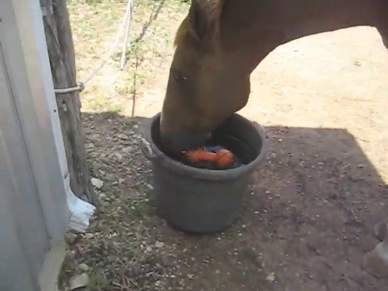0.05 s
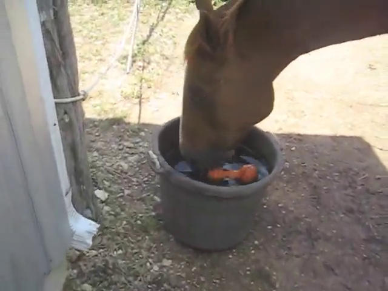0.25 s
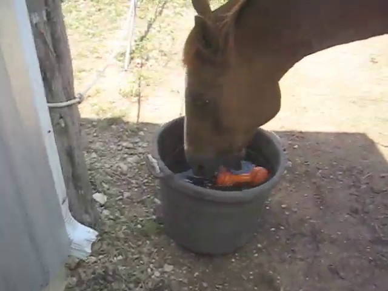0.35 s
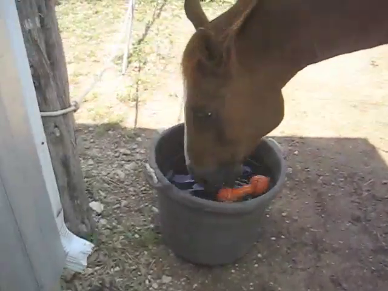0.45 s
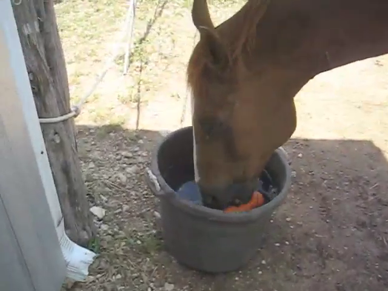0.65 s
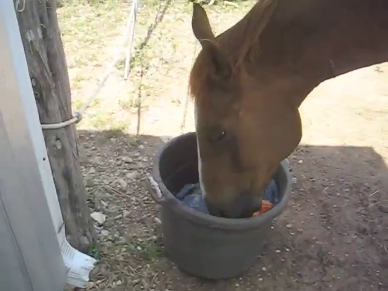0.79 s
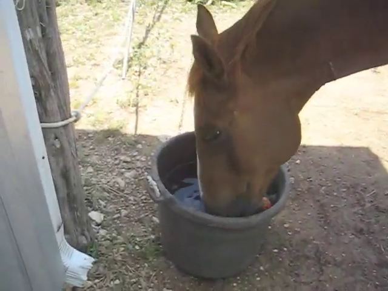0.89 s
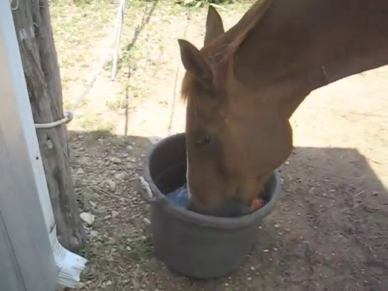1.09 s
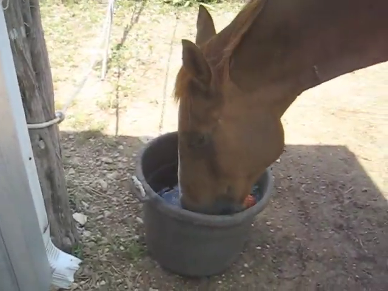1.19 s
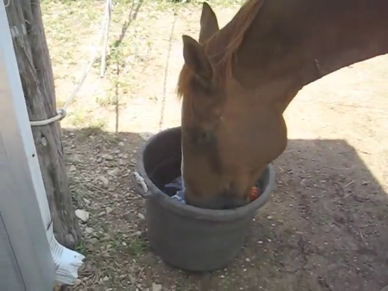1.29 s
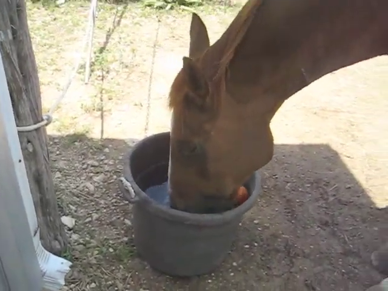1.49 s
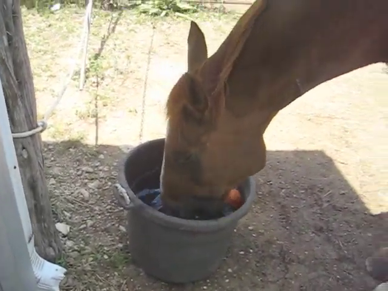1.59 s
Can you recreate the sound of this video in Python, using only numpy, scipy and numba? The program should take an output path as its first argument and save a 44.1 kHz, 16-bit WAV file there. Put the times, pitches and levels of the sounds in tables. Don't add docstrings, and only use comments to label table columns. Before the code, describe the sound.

Water splashes in a plastic tub as a horse pushes a floating toy: bubbles, sharp slaps, then a burst of churning with hollow knocks, fading to drips; small camera microphone a few metres away in a quiet yard.

```python
import sys
import numpy as np
from scipy import signal
from scipy.fft import rfft, irfft
from scipy.io import wavfile
from numba import njit

SR = 44100
rng = np.random.default_rng(int(sys.argv[2]) if len(sys.argv) > 2 else 0)


def wav_record(signal):
    frames = np.transpose(np.atleast_2d(signal))
    bounded = np.clip(frames, -1, 1)
    quanta = np.round(bounded * 32767).astype(np.int16)
    wavfile.write(sys.argv[1], SR, quanta)


def amplitude_ratio(level_db):
    exponent = np.asarray(level_db, float) / 20
    return 10 ** exponent


N = 72765

# (time [s], level [dB], pitch [Hz], ring T60 [s])
BUBBLE_EVENTS = [(.057, -36, 2910, 0.034), (0.212, -29.5, 990, 0.015), (.2745, -24, 3320, 0.01),
                 (0.274, -21.5, 5900, 0.0062), (.391, -23.5, 1380, 0.0084), (.507, -33, 3440, 0.01),
                 (0.59, -41, 1360, 0.036), (.647, -34.5, 1340, 0.011), (0.674, -28.5, 3036, 0.021),
                 (0.676, -33.5, 4380, 0.017), (0.686, -37, 2100, .012), (0.706, -37.5, 1920, 0.024),
                 (0.751, -26.5, 6010, 0.032), (.750, -23.5, 4150, 0.014), (0.751, -25, 4380, .022),
                 (.750, -33, 6800, 0.013), (.777, -41, 3900, 0.017), (0.7603, -31, 1170, 0.02),
                 (.761, -38, 910, .02), (.855, -34, 4740, .01), (0.8146, -22.5, 1860, 0.028),
                 (0.878, -25, 3320, 0.02), (0.984, -39.5, 1730, 0.025), (1.131, -37, 2740, 0.022),
                 (1.220, -39.5, 1886, 0.064), (1.2571, -35, 4070, 0.029), (1.275, -33.5, 2030, 0.0323),
                 (1.283, -34, 1330, 0.011), (1.3023, -31, 3520, 0.021), (1.378, -30, 1090, 0.02),
                 (1.524, -36.5, 3070, 0.018), (1.526, -40, 4570, 0.015), (1.622, -38, 3140, .025)]
# (time [s], level [dB], pitch
# [Hz])
GULP_EVENTS = [(0.217, -28, 1070), (0.219, -21.5, 3330), (0.2234, -30, 950), (0.23, -31, 1090),
               (0.272, -29, 1200), (.2115, -27, 900), (.454, -27, 3500), (.4545, -29, 2700),
               (1.146, -27, 4700), (.838, -29, 6700), (.222, -33, 5800), (.2255, -31, 1500),
               (.233, -34, 800), (.282, -33, 900), (.479, -36, 880), (.511, -34, 1150), (.836, -32, 1000),
               (.866, -25, 1050), (.884, -23, 1050), (.897, -25, 1150), (.900, -28, 800), (.912, -26, 1000),
               (1.312, -38, 850), (1.2585, -35, 4400), (.064, -38, 3150), (.05, -42, 2500),
               (1.363, -32, 6300), (1.626, -40, 3800), (1.05, -40, 2100), (0.225, -32, 1220),
               (0.288, -35, 1030), (0.343, -39.5, 1070), (0.496, -29, 1110), (0.8594, -26.5, 1160),
               (0.862, -21.5, 1380), (0.867, -20.5, 1250), (.877, -28, 990), (0.8807, -16, 1183),
               (0.889, -21.5, 990), (.893, -24, 1310), (.904, -23.5, 1340), (.9085, -19.5, 1200),
               (.943, -33, 1180), (0.967, -39, 900), (0.095, -36, 1140), (1.128, -33, 907),
               (1.14, -33.5, 1000), (1.228, -34, 1340), (1.294, -36, 1170), (1.384, -31, 2840),
               (1.388, -28, 6500), (1.272, -35, 4040)]
# (start [s], rise [s], fall [s], level [dB], spray relative to churn [dB])
SURGE_EVENTS = [(.185, 0.047, 0.06, -35, 2), (.27, 0.0096, 0.046, -31, -10), (.30, 0.042, 0.063, -34.5, -4),
                (.452, .008, 0.04, -41, 7), (.494, 0.011, 0.071, -36.5, 0.5),
                (0.754, .01, 0.071, -36, -6.5), (.82, 0.045, 0.039, -28.5, 3.5),
                (.865, .02, 0.04, -29.5, 4), (.885, 0.026, 0.042, -30.5, -1), (.93, .04, 0.075, -47, -19),
                (.55, 0.042, 0.064, -45, -6), (1.06, 0.055, 0.035, -44.5, 4), (1.12, 0.023, 0.039, -35, -3),
                (1.21, 0.013, 0.021, -44.5, 0), (1.345, 0.04, .035, -38.5, -0.5)]
# (time [s], level [dB], centre [Hz], scatter [s])
SLAP_EVENTS = [(0.2667, -10, 9360, .003), (.271, -17, 7000, 0.0043), (.391, -24.5, 4040, 0.0025),
               (0.4532, -9.5, 3500, 0.0096), (0.4536, -11, 5900, 0.0036), (0.497, -24, 6100, 0.004),
               (0.647, -26.5, 5900, 0.0078), (0.689, -20.5, 6900, 0.0075), (.8145, -22, 4800, 0.003),
               (.8365, -13.5, 7100, 0.0075), (.771, -23, 6040, .003), (.218, -22, 5750, 0.0093),
               (.864, -21, 4400, 0.009), (.8765, -18.5, 6000, 0.00296), (.883, -20, 5540, .008),
               (.899, -17.5, 6060, 0.0089), (1.378, -21.5, 1760, 0.011), (1.145, -11, 10000, 0.0025),
               (1.145, -12, 4600, 0.004), (1.146, -21.5, 1540, 0.0065), (0.2658, -19, 1570, 0.0026),
               (0.2729, -16.5, 5200, 0.0041), (.4535, -18, 1750, 0.009), (0.268, -34, 8000, 0.0037),
               (1.3023, -20.5, 3840, 0.0036), (1.361, -20, 5050, 0.0054), (1.429, -25, 12600, 0.0022),
               (1.472, -30, 3000, .004), (1.483, -24, 5200, 0.0062), (1.495, -27, 4800, 0.0041),
               (1.533, -29, 6640, 0.0031), (1.548, -29, 6500, 0.0049), (1.633, -24.5, 8600, 0.0039)]
# (time [s], level [dB], loudest mode [Hz], T60 [s])
BUMP_EVENTS = [(.209, -40, 440, 0.033), (.221, -39, 410, 0.027), (0.238, -42, 380, .03),
               (0.2759, -32, 295, .022), (.33, -47, 300, .03), (.344, -44, 480, .025),
               (0.4983, -26, 383, .018), (.506, -35, 557, .03), (.513, -41, 420, .02),
               (.762, -39.5, 487, 0.026), (.826, -34, 490, 0.03), (0.827, -38, 235, 0.054),
               (.847, -29, 176, 0.017), (0.854, -24, 320, 0.023), (.858, -24, 482, .035),
               (.857, -27, 767, 0.057), (0.864, -34, 194, 0.031), (.875, -26.5, 329, .03),
               (.882, -29, 494, 0.029), (.892, -25, 307, .035), (.908, -35, 480, 0.021),
               (0.912, -39, 325, 0.024), (1.382, -41, 588, 0.013)]
# (frequency [Hz], level [dB], T60 [s])
WALL_MODES = [(167, -11, 0.032), (240, 0, 0.033), (330, 4.5, 0.042), (370, -21, 0.23), (470, 11, 0.056),
              (775, 1.5, 0.045)]
# (time [s], level [dB])
WIND_GUSTS = [
    (1.22, -88),
    (1.3, -71),
    (1.4, -93),
    (1.46, -58),
    (1.502, -71),
    (1.585, -56),
    (1.65, -70),
]
# (time [s], level [dB], pitch [Hz], T60 [s])
WIND_PUFF = (1.627, -27, 95, .042)
# (frequency [Hz], density [dB per Hz])
YARD_SPECTRUM = [(71, -60), (120, -1.5), (684, 0), (1120, -0.5), (3450, -4.5), (11100, -16), (14700, -9),
                 (16000, -16)]
# (frequency [Hz], level [dB])
WHINE_TONES = [(15122, -83), (15149, -72)]

CHURN_HZ, CHURN_OCTAVES, CHURN_CYCLES = 1164, 0.45, 14.3
SPRAY_HZ, SPRAY_OCTAVES, SPRAY_CYCLES = 5200, 1.067, 7.8
CLUMP_S = 0.0021
GULP_CYCLES, SLAP_CYCLES = 13.1, 7.2
GRAIN_SIZE_DB = 5.5
ECHO_DB, ECHO_T60_S = -4, 0.013
TAIL_DB, TAIL_T60_S = -13, 0.1


@njit
def ring(n, at, hz, t60, size, glide, rise, hold, sr):
    y = np.zeros(n)
    for k in range(len(at)):
        start = int(at[k] * sr)
        length = int(t60[k] * sr) + 2
        step = 2 * np.pi * hz[k] / sr
        phase = 0.
        for j in range(max(start, 0), min(start + length, n)):
            u = (j - start) / length
            fade = np.exp(-6.9 * u * (1 - hold + hold * u))
            y[j] += size[k] * np.sin(phase) * min(phase / rise, 1.) * fade
            phase += step * (1 + glide * u)
    return y


def grains(at, hz, t60, size, glide, rise_cycles=0.93, hold=0.):
    rise = 2 * np.pi * max(rise_cycles, .05)
    hold = float(np.clip(hold, 0, 1))
    hz = np.clip(hz, 60., .4 * SR)
    return ring(N, 1. * at, hz, 1. * t60, 1. * size, float(glide), rise, hold, float(SR))


def swarm(at, db, hz, octaves, cycles, rise_cycles=0.51):
    f = hz * 2 ** (octaves * np.clip(rng.standard_normal(len(at)), -2, 2))
    spread = np.minimum(rng.exponential(size=len(at)), 2.5) - 2
    size = amplitude_ratio(db + GRAIN_SIZE_DB * spread) * rng.choice([-1, 1], len(at))
    return grains(at, f, cycles / f, size, 0.25, rise_cycles)


def band(x, lo_hz, hi_hz):
    sos = signal.butter(2, [lo_hz, min(hi_hz, .48 * SR)], "band", fs=SR, output="sos")
    return signal.sosfilt(sos, x)


def bubbles(count=4):
    t, db, hz, t60 = np.array(BUBBLE_EVENTS).T
    out = grains(t, hz, 0.5 * t60, amplitude_ratio(db + 2.5), -0.058, 0.48, 0.65)
    scatter = np.clip(rng.standard_normal((2, count, len(t))), -1.6, 1.6)
    for late, detune in zip(*scatter):
        at = t + .15 * t60 * abs(late)
        out = out + grains(at, hz * (1 + .12 * detune), .3 * t60, amplitude_ratio(db - 10), -.1, .7, .5)
    return out


def gulps():
    t, db, hz = np.array(GULP_EVENTS).T
    return grains(t, hz, GULP_CYCLES / hz, amplitude_ratio(db), 0.034, 1.0, 0.58)


def surges(count=160, clumps=24):
    out = 0
    for t, rise, fall, db, spray_db in SURGE_EVENTS:
        length = rise + fall

        def swell_db(u):
            return np.where(u < rise, -14 * (1 - u / rise), -22 * (u - rise) / fall)

        db = db + 10 * np.log10(length / 0.075)
        u = rng.random(count) * length
        out = out + swarm(t + u, db + swell_db(u), CHURN_HZ, CHURN_OCTAVES, CHURN_CYCLES)
        u = rng.random(2 * count) * length
        level = db + spray_db + 2.5 + swell_db(u)
        out = out + swarm(t + u, level, SPRAY_HZ, SPRAY_OCTAVES, SPRAY_CYCLES)
        at, tone, lift = (np.repeat(c, 10) for c in rng.random((3, clumps)))
        u = at * length + CLUMP_S * rng.random(len(at))
        level = db + spray_db + 9 * (lift - .3) + swell_db(u)
        out = out + swarm(t + u, level, SPRAY_HZ * 2 ** (2.37 * (tone - .55)), 0.22, 6.4)
    return out


def slaps(count=24):
    out = 0
    for t, db, hz, scatter in SLAP_EVENTS:
        late = rng.random(count) ** 1.5
        splash = swarm(t + scatter * late, db - 7.0 - 12 * late, hz, 0.51, SLAP_CYCLES, 0.37)
        crack_db = db + 2 + min(db + 15, 0)
        crack = grains(np.array([t]), np.array([hz]), np.array([4. / hz]), amplitude_ratio(np.array([crack_db])), 0, .3)
        out = out + band(splash + crack, hz / 1.8, hz * 1.8)
    return out


def bumps():
    t, hit_db, lead_hz, lead_t60 = np.array(BUMP_EVENTS).T
    out = grains(t, lead_hz, lead_t60, amplitude_ratio(hit_db), 0, 0.9, 0.86)
    scatter = rng.standard_normal((2, len(WALL_MODES), len(t)))
    for (hz, db, t60), tune, late in zip(WALL_MODES, *scatter):
        at = t + .0015 * abs(late)
        out = out + grains(at, hz * (1 + .04 * tune), t60 + 0 * t, amplitude_ratio(db + hit_db - 18), 0, .5)
    return out


def trickle(count=500):
    return swarm(rng.random(count) * N / SR, -51.5, 2110, 0.95, 13.3)


def tub(x, echo_db=0):
    t = np.arange(SR // 6) / SR
    sparse = rng.random(len(t)) < .03
    taps = rng.standard_normal(len(t)) * sparse * amplitude_ratio(-60 * t / ECHO_T60_S) * (t > .0007)
    tail = rng.standard_normal(len(t)) * amplitude_ratio(-60 * t / TAIL_T60_S) * (t > .002)
    ir = amplitude_ratio(ECHO_DB) * taps / np.linalg.norm(taps) + amplitude_ratio(TAIL_DB) * tail / np.linalg.norm(tail)
    return x + amplitude_ratio(echo_db) * signal.fftconvolve(x, ir)[:N]


def colour(points):
    f = np.arange(N // 2 + 1) * SR / N + 1
    hz, db = np.array(points).T
    spectrum = rfft(rng.standard_normal(N)) * amplitude_ratio(np.interp(np.log(f), np.log(hz), db))
    x = irfft(spectrum, N)
    return x / x.std()


def wind():
    gust_t, gust_db = np.array(WIND_GUSTS).T
    gust = amplitude_ratio(-66.5) + amplitude_ratio(np.interp(np.arange(N) / SR, gust_t, gust_db))
    rumble = colour([(15, -9), (45, -0.5), (110, 1.5), (200, -20), (500, -63), (20000, -90)])
    at, db, hz, t60 = np.array([WIND_PUFF]).T
    return gust * rumble - grains(at, hz, t60, amplitude_ratio(db), 0, 1., .9)


def yard():
    return amplitude_ratio(-48) * colour(YARD_SPECTRUM)


def whine():
    t = np.arange(N) / SR
    return sum(amplitude_ratio(db + 4.0) * np.sin(2 * np.pi * hz * t) for hz, db in WHINE_TONES)


def scene():
    water = tub(bubbles(), -8) + tub(gulps(), -9)
    water = water + band(tub(surges()), 380, 18000)
    water = water + amplitude_ratio(3) * tub(slaps(), -2)
    water = water + tub(trickle())
    wall = amplitude_ratio(-3) * tub(bumps(), -10)
    air = wind() + yard() + whine()
    return (band(water, 534.0, 15500.0) + band(wall, 97.0, 4200.0) + air)[None]


def band_limit(x):
    return signal.sosfilt(signal.butter(12, 16850, fs=SR, output="sos"), x)


def record(dry):
    low_pass = signal.ellip(10, .3, 60, 15900, fs=SR, output="sos")
    mix = signal.sosfilt(low_pass, dry)
    return band_limit(mix)


dry = scene()
out = record(dry)
wav_record(out)
```